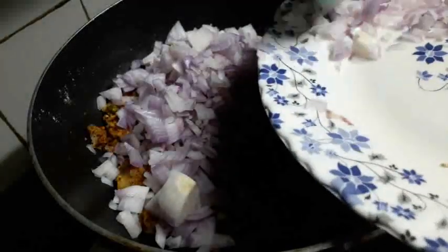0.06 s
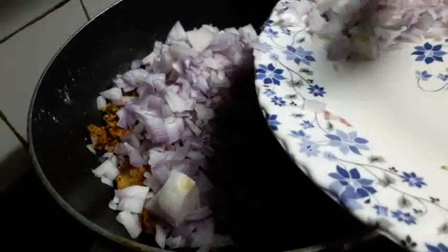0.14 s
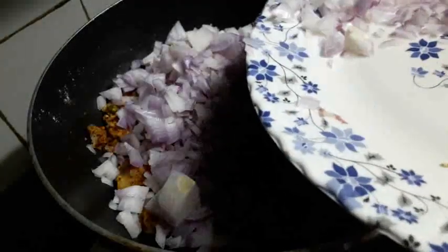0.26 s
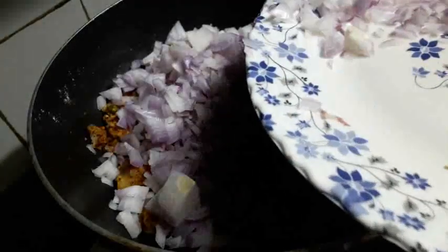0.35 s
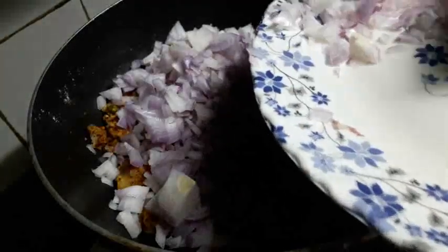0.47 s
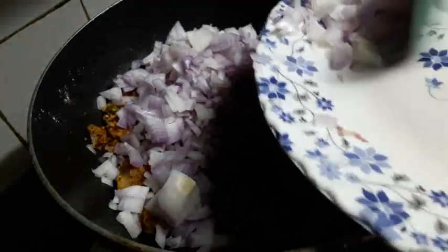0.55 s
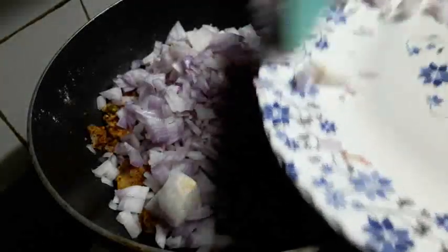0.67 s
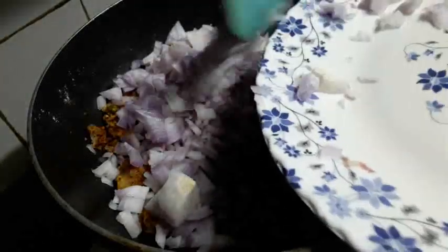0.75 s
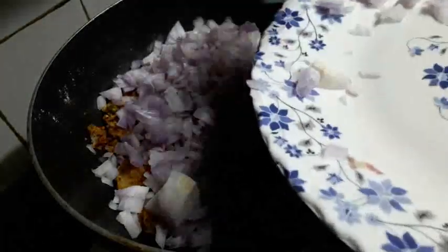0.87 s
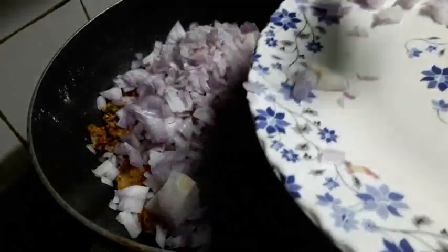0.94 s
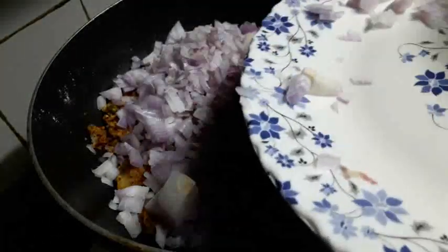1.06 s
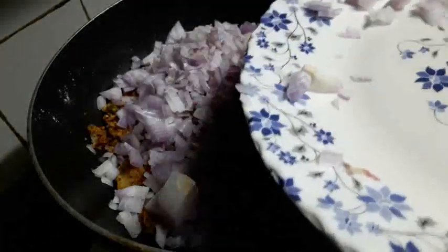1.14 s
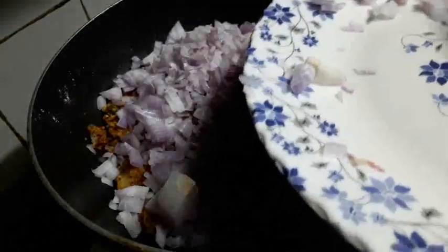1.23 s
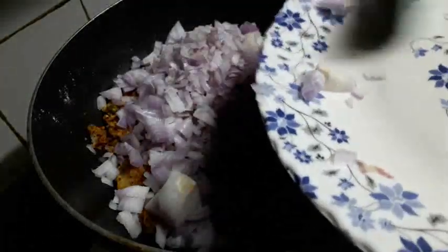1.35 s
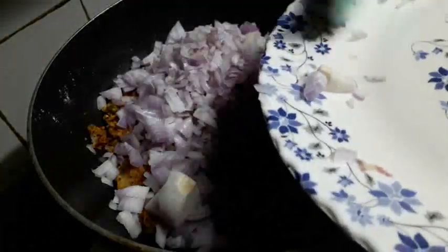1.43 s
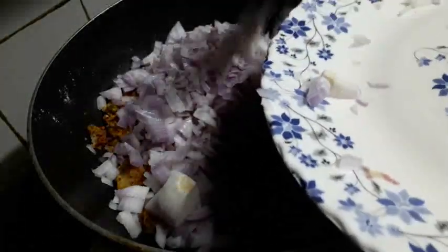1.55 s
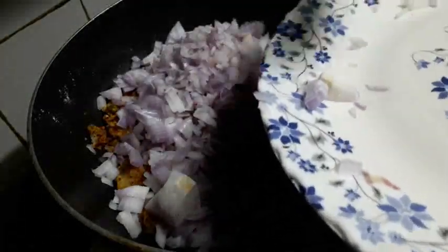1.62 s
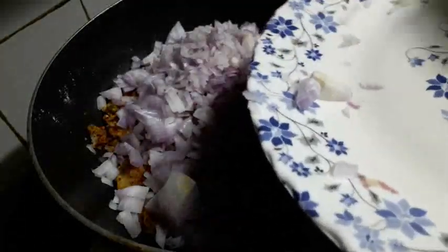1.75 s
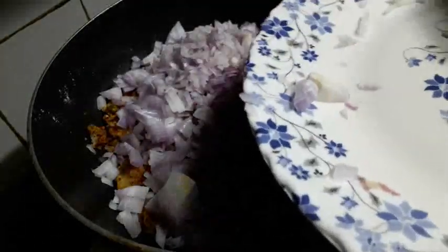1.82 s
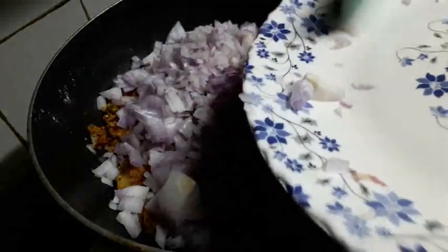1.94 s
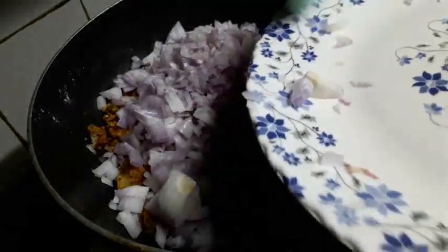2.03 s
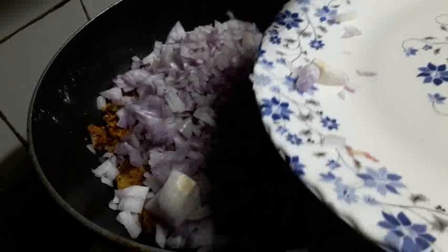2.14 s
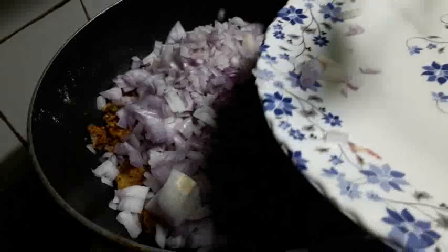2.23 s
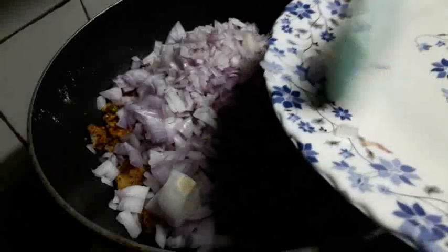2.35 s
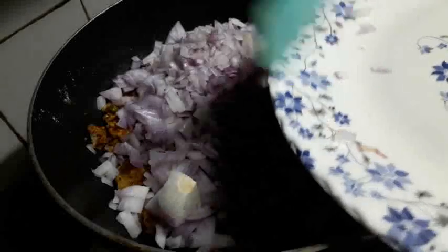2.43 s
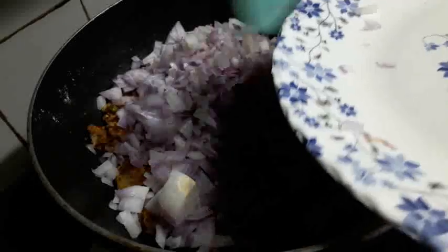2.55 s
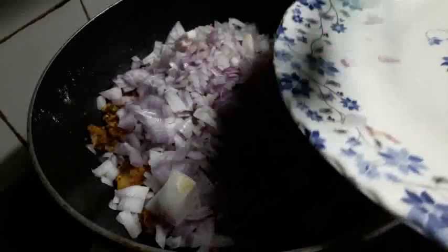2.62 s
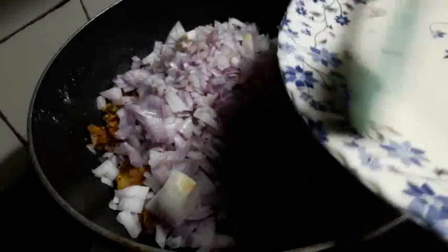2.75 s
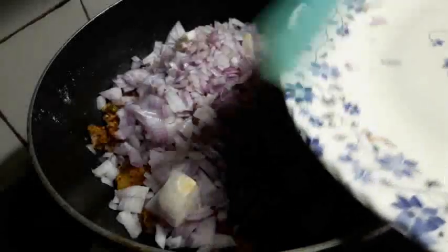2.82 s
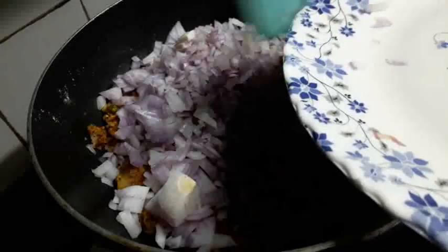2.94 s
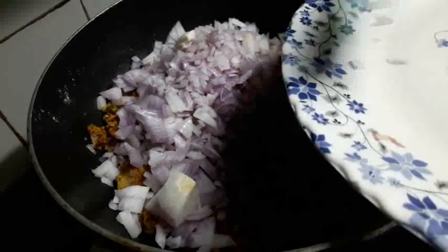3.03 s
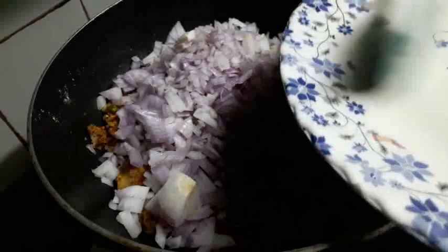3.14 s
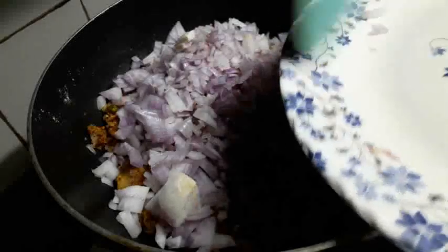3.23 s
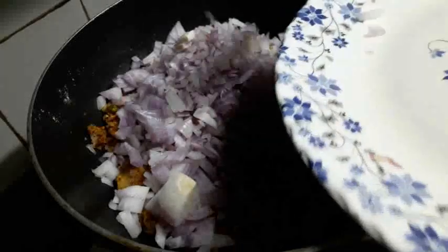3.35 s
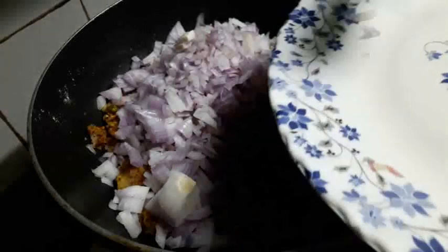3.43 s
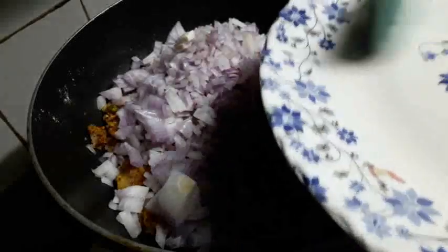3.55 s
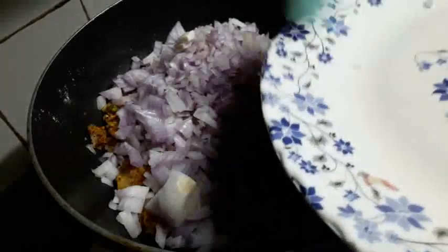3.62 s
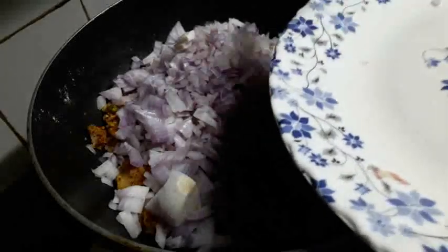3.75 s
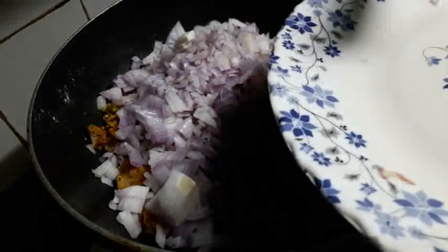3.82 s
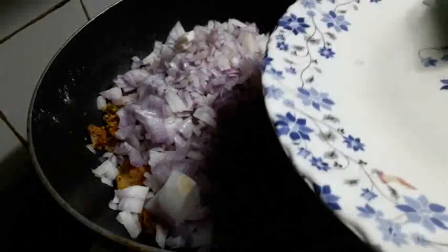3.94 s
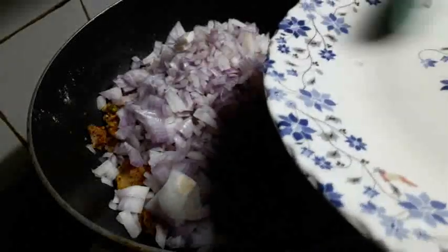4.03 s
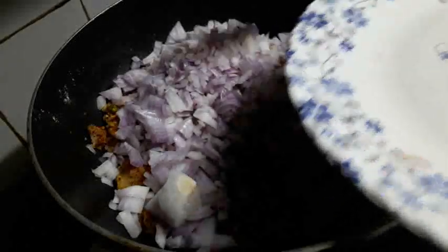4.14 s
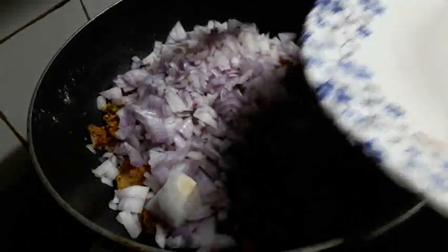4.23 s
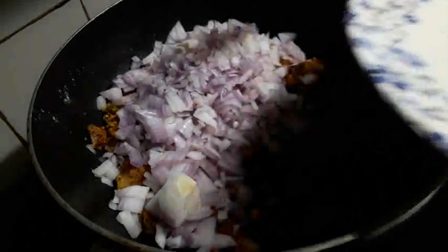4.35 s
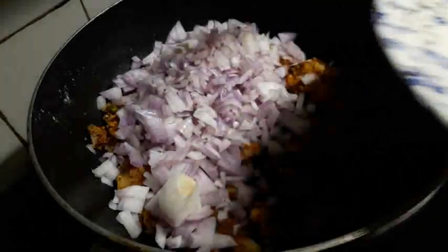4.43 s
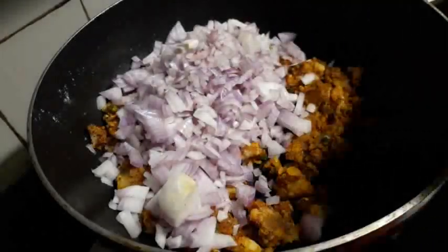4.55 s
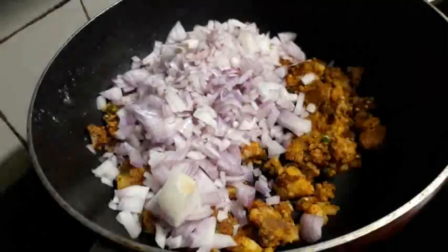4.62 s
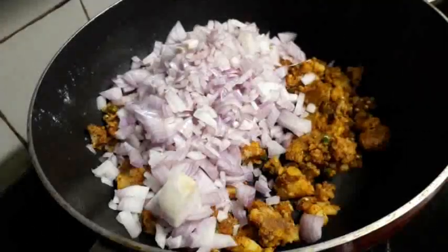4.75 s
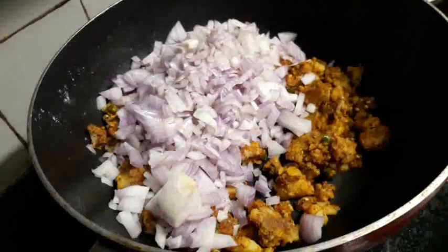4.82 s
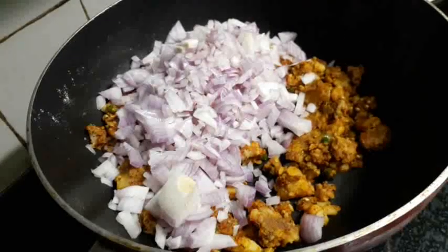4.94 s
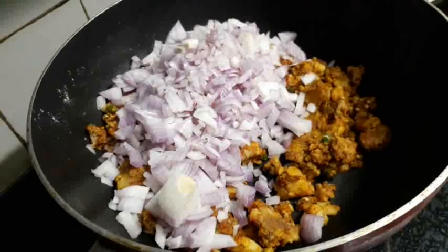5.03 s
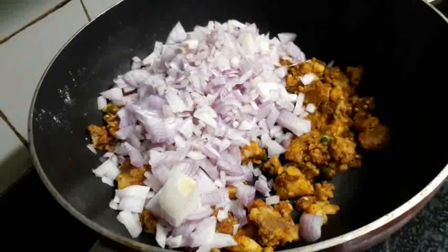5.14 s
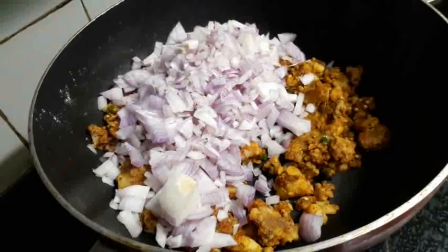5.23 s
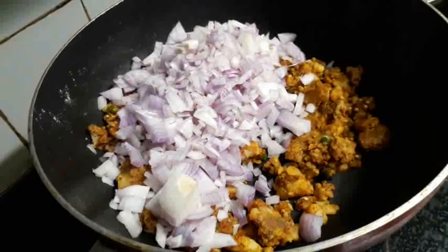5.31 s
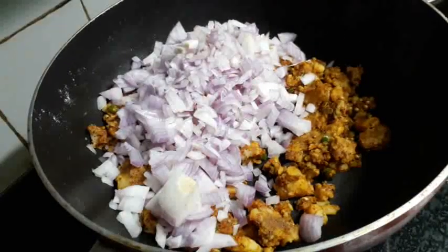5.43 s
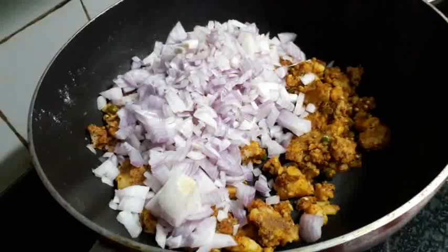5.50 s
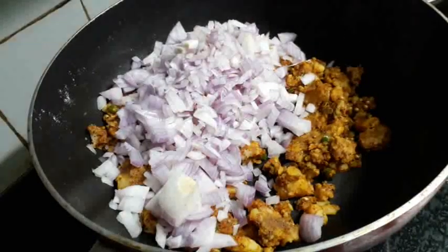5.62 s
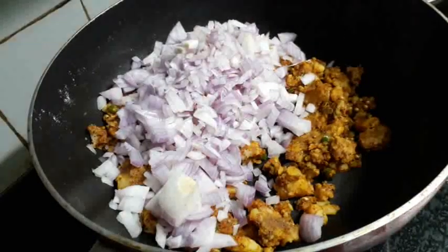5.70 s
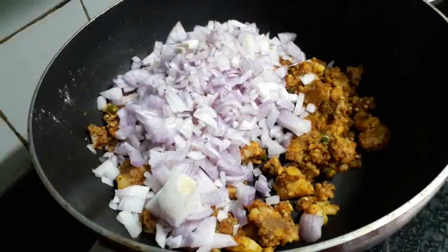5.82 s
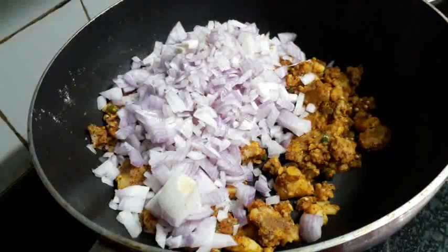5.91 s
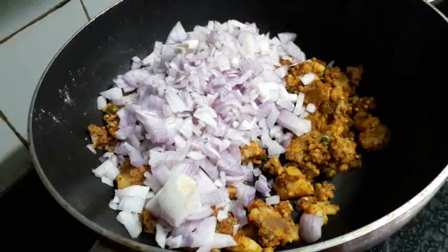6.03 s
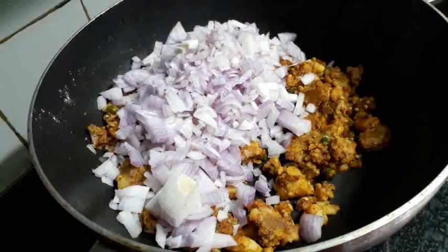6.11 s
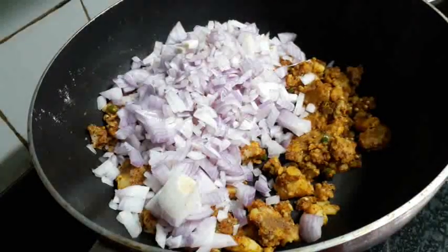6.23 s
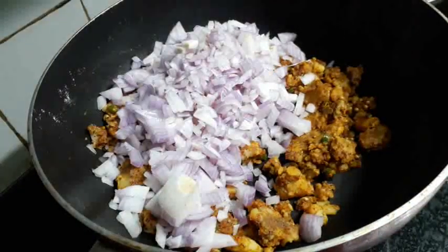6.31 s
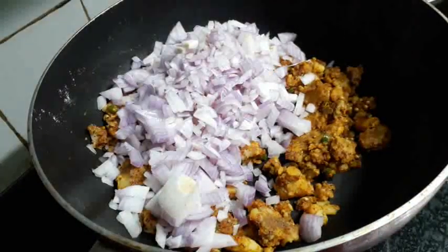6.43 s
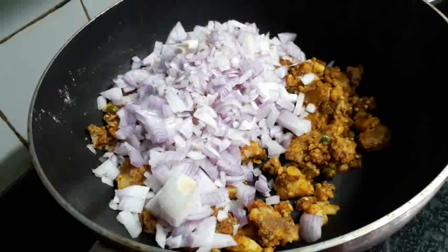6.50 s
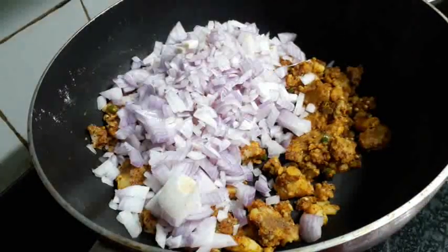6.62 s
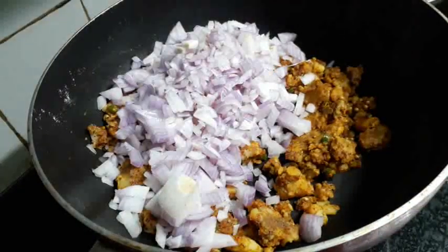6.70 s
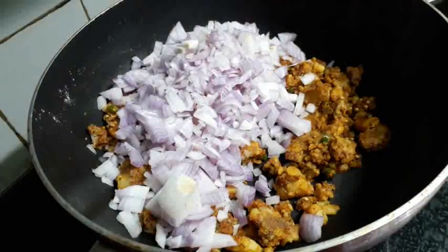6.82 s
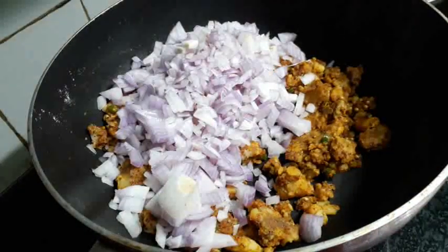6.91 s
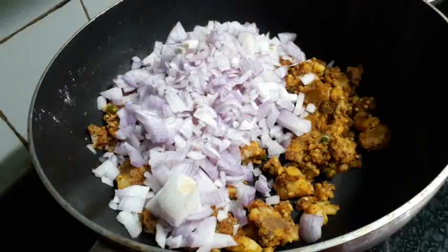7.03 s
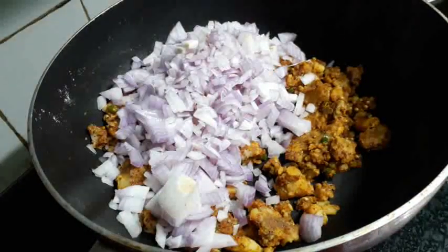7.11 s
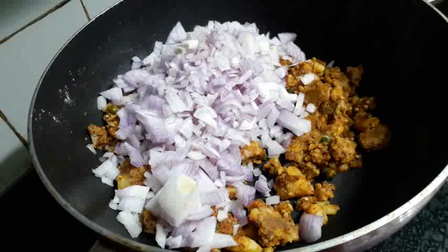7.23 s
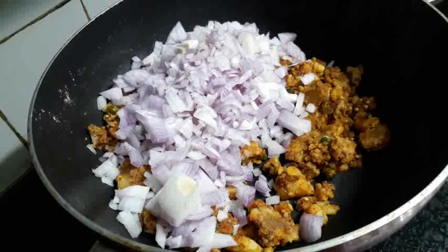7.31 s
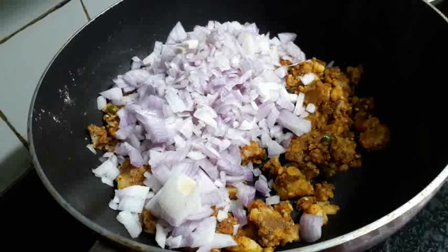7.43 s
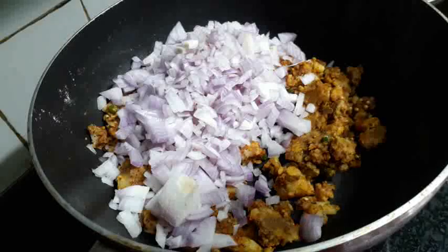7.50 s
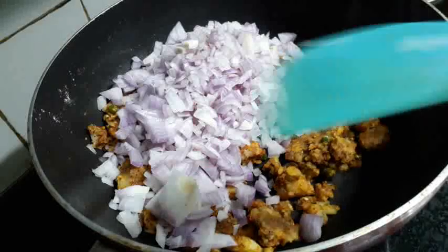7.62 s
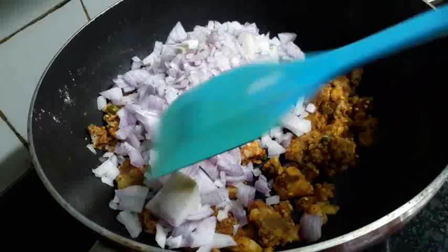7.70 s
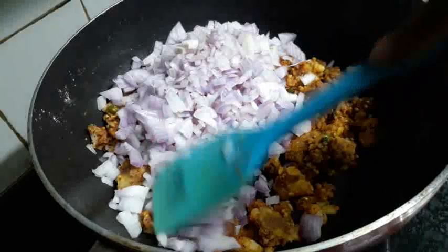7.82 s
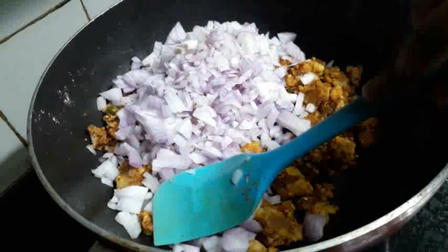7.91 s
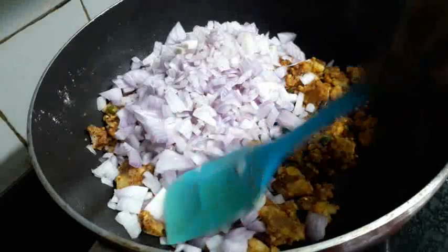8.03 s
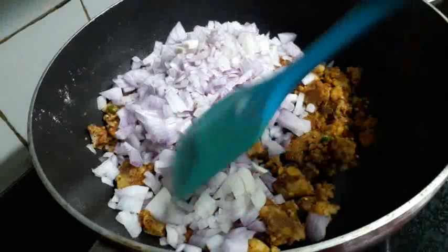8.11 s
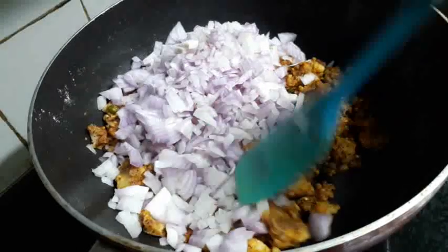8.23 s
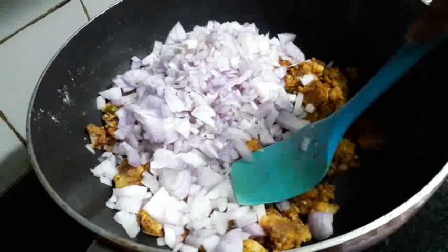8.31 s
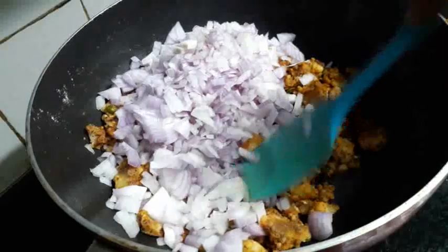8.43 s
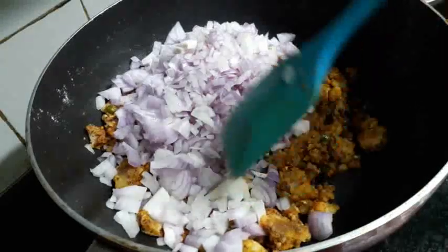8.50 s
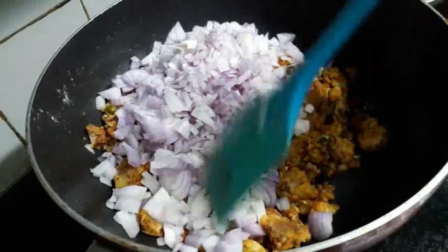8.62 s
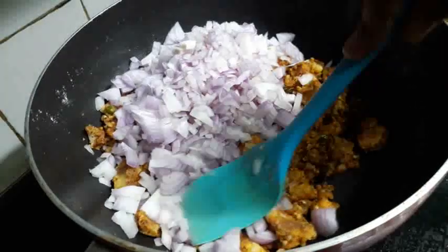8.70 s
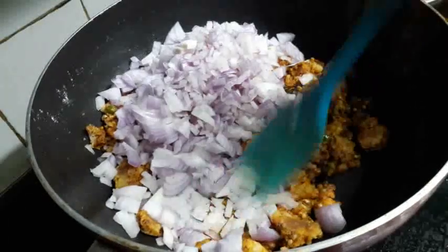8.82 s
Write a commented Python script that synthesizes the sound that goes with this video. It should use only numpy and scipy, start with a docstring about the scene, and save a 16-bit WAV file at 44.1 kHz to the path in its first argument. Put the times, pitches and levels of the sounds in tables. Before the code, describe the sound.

Oil sizzles softly over a low gas flame in a small kitchen, heard up close. A soft spatula taps and wipes chopped onion off a plate, which clacks sharply against the pan's rim several times. The sizzle grows brighter as the plate lifts away. The plate is set down and clacks on the counter, then the spatula digs quietly through crisp onion in the pan.

```python
"""Chopped onion is pushed off a plate into a hot pan in a small tiled kitchen.
Oil hisses and pops over a rumbling gas flame. A silicone spatula taps dull notes from the plate and wipes
wet onion over the glaze; pieces snap, the plate clacks on the rim, the pan thuds on its stand.
From 4.3 s the plate is lifted and the frying opens up. The plate is set down at 5.44 s and clacks
sharply on the counter at 7.2 s. From 7.8 s the spatula digs through crisp pieces to the pan's floor."""
import sys
import numpy as np
from scipy import signal
from scipy.fft import rfft, irfft, next_fast_len
from scipy.io import wavfile

SR = 44100
rng = np.random.default_rng(int(sys.argv[2]) if len(sys.argv) > 2 else 0)


def unload_wav(signal):
    """Save mono or channel-first audio to the path in sys.argv[1] as 16-bit WAV at rate SR, clipped to [-1, 1]."""
    wavfile.write(
        sys.argv[1],
        SR,
        np.round(np.clip(np.atleast_2d(signal).T, -1, 1) * 32767).astype(np.int16),
    )


N = 390637
RING_SAMPLES = 10000
AGE_S, TIME_S = np.arange(RING_SAMPLES) / SR, np.arange(N) / SR
NOTE_HZ, OVERTONE_HZ = 353.3, 601.7  # the plate's low note and its overtone

# Spectra of flame, frying hiss, oil spray and a hard contact. Each row: frequency in Hz, level in dB.
FLAME_SPECTRUM = [(25, -46), (38, -16), (48, -0.5), (64, -13), (95, -7), (113, 2.5), (128, -1.5),
                  (185, 1.5), (230, -13), (310, -7), (540, -18), (780, -14), (1100, -25.5), (3000, -36.5)]
HISS_SPECTRUM = [(300, -7), (750, -5.5), (1100, -8.5), (1700, -5), (2400, -4), (3100, 0.5), (5200, 4),
                 (7000, 2), (8300, 3.5), (9500, -3), (11000, -23), (13000, -76)]
SPRAY_SPECTRUM = [(7000, -30), (9500, -8), (12000, 0), (13200, -1), (14800, -5.5), (16000, -26)]
CRACK_SPECTRUM = [(30, -31), (80, -36), (130, 2.5), (700, 4.5), (1150, -5), (2000, 6.5), (4200, 0),
                  (5500, 3.5), (8000, 3), (10000, -5), (15000, -5)]
# Modes of the free plate (upper), the pan's stand, the plate on the counter and the loaded pan.
# Each row: frequency in Hz, level in dB, t60 in seconds.
PLATE_MODES = [(460, -36, 0.19), (563, -27, 0.15), (630, -20.5, 0.041), (741, -11.5, 0.035),
               (800, -21, 0.038), (849, -25, 0.058), (1070, -28.5, 0.091), (1110, -27.5, 0.14),
               (1390, -16, 0.061), (1497, -20, 0.031), (1586, -26, 0.032), (1871, -12, 0.05),
               (2010, -29, 0.12), (2210, -36, 0.076), (2405, -16.5, 0.058), (2830, -29, 0.069),
               (2980, -37, 0.056), (3515, -27, 0.06), (3740, -28, 0.047), (4560, -12, 0.015),
               (5280, -26, 0.058), (5940, -27.5, 0.05), (6830, -36, 0.035), (8220, -30, 0.023),
               (9300, -41, 0.03)]
STAND_MODES = [(76, -6, 0.08), (115, -13, 0.29), (174, 2, 0.039), (220, 5, 0.034), (290, 0.5, 0.1)]
COUNTER_MODES = [(297, -24, 0.063), (490, -32, 0.031), (795, -17, 0.014), (1100, -21, 0.067),
                 (1390, -8.5, 0.048), (1500, -3.5, 0.018), (1760, -12.5, 0.053), (1830, -9.5, 0.043),
                 (1970, -19, 0.055), (2420, -9, 0.029), (3070, -25, 0.031), (4080, -20, 0.04),
                 (6300, -15, 0.023)]
PAN_MODES = [(308, -4.5, 0.028), (472, -10, 0.1), (553, -13, 0.06), (724, -4, 0.022), (810, -10, 0.026),
             (931, -4, 0.042), (1060, -13, 0.03), (1234, -7, 0.036), (1480, -9, 0.025), (2960, -1, .008),
             (4570, 0, 0.0053)]
# Onion meets hot oil as it is pushed in or stirred. Each row: start in seconds, time to release in seconds,
# boost in dB.
FLARES = [(0.244, 2, 1.5), (2.0, 0.9, 2), (8.2, 0.5, 0.5)]
# Dull plate notes. Each row: start in seconds, note level in dB, pitch in Hz, t60 in seconds,
# time to choke in seconds, relative overtone level in dB.
TAPS = [(0.16, -48, 355, 0.038, .03, -13), (.318, -33.5, 358, 0.05, .04, -14),
        (1.1118, -25.5, 355, 0.14, 0.06, -27), (1.258, -45, 350, 0.088, .05, -13),
        (1.592, -43.5, 347, 0.13, .06, -5), (1.7515, -23, 355.6, 0.23, .029, -10.5),
        (1.893, -42, 354, 0.046, .035, -15), (2.2515, -24.5, 355.6, 0.17, 0.098, -9),
        (2.658, -32.5, 344, 0.1, .05, -22), (3.0548, -22, 356, 0.22, 0.085, -16),
        (3.4522, -22, 357, 0.23, 0.037, -30), (3.874, -27.5, 354, 0.17, 0.061, -15),
        (4.6, -40.5, 356, 0.13, .07, -3.5), (5.445, -25.5, 348, 0.2, 0.086, -24)]
# Wipes and slides. Each row: midpoint in seconds, length in seconds, level in dB, band centre in Hz.
STROKES = [(0.457, 0.17, -49.5, 880), (0.579, 0.062, -53, 2840), (1.237, 0.21, -51.5, 920),
           (1.911, 0.17, -53, 1100), (2.314, 0.12, -55, 1300), (4.594, 0.14, -58.5, 900),
           (7.088, 0.17, -52.5, 1840), (7.168, 0.15, -45, 2310), (7.615, 0.078, -50.5, 2300)]
# Short sharp ticks. Each row: start in seconds, peak in dB, t60 in seconds, frequency in Hz.
TICKS = [(0.586, -34, 0.03, 3600), (0.8093, -23, 0.047, 6840), (5.438, -27, 0.057, 3850),
         (6.673, -18.5, 0.034, 12200), (6.729, -28, .02, 10000), (7.149, -29, 0.21, 9700),
         (7.953, -26, 0.011, 6500), (8.105, -16.5, 0.011, 5970), (8.131, -25, 0.017, 9000),
         (8.148, -22.5, 0.053, 12500), (8.285, -21, 0.009, 8100), (8.292, -27, 0.015, 9000),
         (8.587, -20.5, 0.014, 7600)]
# Hard plate knocks. Each row: start in seconds, level in dB, contact low-pass in Hz, favoured frequency
# in Hz, its boost in dB, starved frequency in Hz, tuning ratio, share of free ring time, rattle in dB.
CLACKS = [(0.678, 1.5, 4850, 2440, 7, 1170, .993, 0.78, -31),
          (0.6865, -7, 2200, 840, 11.5, 1120, 1.0, .7, -25),
          (1.7797, -32, 3000, 1880, -3, 735, 1.0, 0.82, -14),
          (2.3896, -1, 7200, 2230, 2.5, 2840, 0.99, .85, -17),
          (2.421, -18.5, 700, 550, 18.5, 1100, 1.0, 1, -10),
          (2.8078, 1.5, 11300, 1630, 3.5, 540, 1.01, 0.83, -29),
          (3.1691, 1.5, 8450, 1790, 2, 2500, 1.017, 0.92, -14),
          (3.1814, -10, 1100, 680, -2, 1400, 0.89, .8, -17),
          (3.193, -15.5, 3000, 2400, 4, 1880, 1.01, 1, -9),
          (3.216, -22, 700, 600, 5, 1100, 0.91, 0.81, -14), (3.475, -35, 1600, 1400, 7, 735, 0.89, .6, -12),
          (3.501, -31, 900, 795, 4, 1880, 1.1, 0.96, -4),
          (4.0455, -9.5, 2900, 1400, 4.5, 2420, 1.01, 0.93, -19),
          (4.0572, -12, 2500, 1390, -1, 2390, 1, 0.82, -2), (5.4409, -14, 890, 1080, 1, 1850, 0.9, .9, -14)]
# Low thuds. Each row: start in seconds, level in dB.
THUDS = [(2.251, -36), (2.286, -40), (2.301, -38), (2.3887, -37), (2.658, -31), (5.446, -31.5)]
# Plate on counter. Each row: start in seconds, level in dB, contact low-pass in Hz.
COUNTER_KNOCKS = [(4.67, -36, 1500), (5.835, -37.5, 3500), (5.9, -32.5, 1800), (7.140, -43, 5000),
                  (7.2178, -2, 4150)]
# Spatula in the pan. Each row: start in seconds, relative level in dB, decay scale in seconds,
# knock over rub in dB, frequency of the pan's response in Hz, crunch over rub in dB.
DIGS = [(7.829, -31.5, 0.074, -3, 1100, -6), (8.074, -30, 0.09, -4.5, 1200, -3.5),
        (8.214, -43, 0.025, -18, 1000, -5), (8.274, -36.5, 0.083, -6, 950, -5),
        (8.66, -26.5, 0.06, -10, 750, -14), (8.681, -33, 0.046, -12, 1100, 0),
        (8.765, -27.5, 0.053, -13, 900, -3.5), (8.783, -31.5, 0.052, -13, 700, -8),
        (8.794, -32, 0.03, -18, 900, 3)]


def undb(db):
    """Decibels to gain."""
    return 10 ** (np.asarray(db) / 20)


def unit(x):
    """Scale to rms 1."""
    return x / np.sqrt(np.mean(x ** 2))


def fade(t60_s):
    """Exponential decay."""
    return np.exp(-np.log(1000) * AGE_S / max(t60_s, 1 / SR))


def add(track, start_s, sound):
    """Mix a sound into the track."""
    i = max(int(start_s * SR), 0)
    track[i:i + len(sound)] += sound[:max(N - i, 0)]


def cut(x, hz, kind, order=2):
    """Butterworth filter."""
    sos = signal.butter(order, np.clip(hz, 10, SR / 2.2), kind, fs=SR, output="sos")
    return signal.sosfilt(sos, x)


def noise(spectrum, size):
    """Shaped noise, rms 1."""
    hz, db = np.transpose(spectrum)
    padded = next_fast_len(size, real=True)
    bins_hz = np.fft.rfftfreq(padded, 1 / SR) + 1
    gain = undb(np.interp(np.log(bins_hz), np.log(hz), db))
    return unit(irfft(rfft(rng.standard_normal(padded)) * gain, padded)[:size])


def walk(rate_hz):
    """Random drift, spread near 1."""
    knots = rng.standard_normal(int(N / SR * rate_hz) + 2)
    return np.interp(TIME_S * rate_hz, np.arange(len(knots)), knots)


def clicks(per_s, size=RING_SAMPLES):
    """Impulses of random time and size."""
    return (rng.random(size) < per_s / SR) * rng.standard_normal(size)


def ring(modes):
    """Damped modes after one sharp blow."""
    return sum(undb(db) * fade(t60_s) * np.cos(2 * np.pi * hz * AGE_S) for hz, db, t60_s in modes)


def gas_flame():
    """Unsteady flame rumble and a faint wavering hum."""
    rumble = noise(FLAME_SPECTRUM, N) * undb(1.05 * walk(7.5))
    hum_hz = 113 + 5 * walk(25)
    hum = np.sin(2 * np.pi * np.cumsum(hum_hz) / SR) * undb(3 * walk(12))
    return undb(-52) * rumble + undb(-56.5) * hum


def frying(lift_s=4.34, lift_length_s=0.3):
    """Bubbles merge into a hiss under fine oil spray; the plate shades both until lifted."""
    covered = np.clip(1 - (TIME_S - lift_s) / lift_length_s, 0, 1)
    shade_db = -5.5 * covered
    hiss_db = -45 + shade_db + flare_db()
    spray_db = -52.5 - 11.5 * covered
    hiss = noise(HISS_SPECTRUM, N) * undb(0.6 * walk(45))
    bubbles = undb(-16) * unit(cut(clicks(per_s=120, size=N), [2500, 8000], "band", order=4))
    spray = noise(SPRAY_SPECTRUM, N) * undb(0.63 * walk(27))
    return undb(hiss_db) * (hiss + bubbles) + undb(spray_db) * spray + undb(shade_db) * pops()


def pops(per_s=14, low_hz=3190, high_hz=8450, t60_s=0.042):
    """Single bubbles burst, each with a tiny ping."""
    out = np.zeros(N)
    for when, pitch, size in rng.random((int(per_s * N / SR), 3)):
        hz = low_hz * (high_hz / low_hz) ** pitch
        db = -45 + 4.5 * (2 * size - 1)
        add(out, when * N / SR, ring([(hz, db, t60_s)]))
    return out


def low_note(hz, t60_s, hold_s, overtone_db, choked_db=-19):
    """The plate's low note and its overtone ring freely, then are choked."""
    overtone = np.cos(2 * np.pi * OVERTONE_HZ * hz / NOTE_HZ * AGE_S) * fade(1.45 * t60_s)
    note = np.cos(2 * np.pi * hz * AGE_S) * fade(t60_s) + undb(overtone_db) * overtone
    free = np.exp(-(AGE_S / hold_s) ** 6)
    return note * (free + undb(choked_db) * (1 - free))


def near(hz, spot_hz, width_octaves=0.21):
    """Bell weight, 1 at spot_hz."""
    return np.exp(-(np.log2(hz / spot_hz) / width_octaves) ** 2)


def crack(t60_s, tail_db, tail_t60_s):
    """Crowded high modes: a burst and a weaker tail."""
    return noise(CRACK_SPECTRUM, RING_SAMPLES) * (fade(t60_s) + undb(tail_db) * fade(tail_t60_s))


def upper_modes(tuning, starved_hz, ring_share=1, favoured_hz=None, favour_db=0):
    """The plate's upper modes and crack; modes with a node near the blow are starved."""
    hz, db, t60_s = np.transpose(PLATE_MODES)
    if favoured_hz:
        db = db + favour_db * near(hz, favoured_hz)
    louder, sharper = rng.standard_normal((2, len(hz)))  # grip and load vary per blow
    db = db - 11 * near(hz, starved_hz) + 1.4 * louder
    modes = ring(zip(hz * tuning * (1 + 0.0054 * sharper), db, t60_s * ring_share))
    return modes + undb(-12) * crack(t60_s=0.016, tail_db=-12, tail_t60_s=0.078)


def taps(firm_tap_db=-8.5):
    """Dull plate notes with faint upper modes: the soft blade lands; at 5.44 s the plate is set down."""
    out = np.zeros(N)
    for start_s, db, hz, t60_s, hold_s, overtone_db in TAPS:
        firmness_db = db - firm_tap_db
        upper = undb(-22 + 0.37 * firmness_db) * upper_modes(hz / NOTE_HZ, starved_hz=4000)
        contact_hz = 1190 * 2 ** (-firmness_db / 27)  # firmer is duller
        note = undb(db) * cut(low_note(hz, t60_s, hold_s, overtone_db), 800, "low")
        add(out, start_s, cut(upper, contact_hz, "low") + note)
    return out


def slaps(thump_hz=121.5):
    """With each dull note, a pitchless contact smack and a low thump."""
    out = np.zeros(N)
    thump = np.sin(2 * np.pi * thump_hz * AGE_S) * fade(0.046)
    for start_s, db, *_ in TAPS:
        smack = cut(rng.standard_normal(RING_SAMPLES) * fade(0.069), [396, 705], "band")
        add(out, start_s, undb(db - 7.5) * smack / np.abs(smack).max() + undb(db - 5.5) * thump)
    return out


def flare_db(attack_s=0.22, release_s=0.52):
    """Onion pushed in or stirred lifts the hiss: swell, hold, settle."""
    boost_db = np.zeros(N)
    for start_s, length_s, db in FLARES:
        rise = (TIME_S - start_s) / attack_s
        fall = 1 - (TIME_S - start_s - length_s) / release_s
        boost_db += db * np.clip(np.minimum(rise, fall), 0, 1)
    return boost_db


def slips(per_s, spread_db):
    """Stick-slip: dense clicks of uneven size."""
    return unit(clicks(per_s) * undb(spread_db * rng.standard_normal(RING_SAMPLES)))


def strokes():
    """Wet pieces drag over the glaze; jerky friction faintly rings the plate."""
    out = np.zeros(N)
    plate = ring(PLATE_MODES)
    for middle_s, length_s, db, hz in STROKES:
        friction = slips(per_s=1400, spread_db=3) * undb(3.2 * walk(70)[:RING_SAMPLES])
        ringing = signal.fftconvolve(friction, plate)[:RING_SAMPLES]
        rub = cut(unit(friction) + undb(-9) * unit(ringing), [hz / 1.68, hz * 1.77], "band")
        swell = np.sin(np.pi * np.minimum(AGE_S / length_s, 1))
        add(out, middle_s - length_s / 2, undb(db) * swell * unit(rub))
    return out


def ticks():
    """Short sharp ticks: onion snaps, oil spits, and the plate's edge as it is set down."""
    out = np.zeros(N)
    for start_s, db, t60_s, hz in TICKS:
        burst = rng.standard_normal(RING_SAMPLES) * fade(t60_s)
        fizz = cut(burst, [hz / 2, hz * 1.08], "band", order=1)
        add(out, start_s, undb(db) * fizz / np.abs(fizz).max())
    return out


def chatter(delay_s=0.0038):
    """The plate's edge skitters: fading rebounds, unit energy."""
    touches = clicks(per_s=310) * fade(0.1) * (AGE_S > delay_s)
    return touches / (np.linalg.norm(touches) + 1e-9)


def clacks(reflection_s=0.002724):
    """Hard knocks wake every plate mode: on the pan's rim, then at 5.44 s as it is set down."""
    out = np.zeros(N)
    for start_s, db, contact_hz, spot_hz, favour_db, starved_hz, tuning, ring_share, rattle_db in CLACKS:
        upper = upper_modes(tuning, starved_hz, ring_share, spot_hz, favour_db)
        rebounds = signal.fftconvolve(upper, chatter())[:RING_SAMPLES]
        rattle = undb(rattle_db) * cut(rebounds, 3900, "low")
        note = undb(-22) * low_note(NOTE_HZ * tuning, t60_s=0.12, hold_s=0.045, overtone_db=-7)
        damping = np.exp(-(AGE_S / (0.045 * ring_share)) ** 2)  # the plate comes to rest
        clack = undb(db) * cut((upper + rattle) * damping + note, contact_hz, "low")
        add(out, start_s, clack)
        add(out, start_s + reflection_s, undb(-17) * cut(clack, 6000, "low"))
    return out


def thuds():
    """Low rattling thuds: the pan on its stand, then at 5.44 s the plate set down."""
    out = np.zeros(N)
    thud = cut(ring(STAND_MODES), 240, "low")
    for start_s, db in THUDS:
        rattle = unit(cut(rng.standard_normal(RING_SAMPLES), [85, 260], "band")) * fade(0.083)
        add(out, start_s, undb(db - 1) * (thud + rattle))
    return out


def counter_knocks():
    """The plate meets the counter, which damps it to a short, bright clack."""
    out = np.zeros(N)
    for start_s, db, contact_hz in COUNTER_KNOCKS:
        knock = ring(COUNTER_MODES) + undb(-15) * crack(t60_s=0.024, tail_db=-9, tail_t60_s=0.063)
        add(out, start_s, undb(db) * cut(knock, contact_hz, "low"))
    return out


def digs():
    """The spatula knocks on the pan's floor and stutters over it, crushing onion."""
    out = np.zeros(N)
    for start_s, db, decay_s, knock_db, hz, crunch_db in DIGS:
        knock = cut(ring(PAN_MODES), [hz / 3.9, hz * 2.6], "band", order=1)
        stutter = slips(per_s=3000, spread_db=0) * fade(2 * decay_s)
        rub = signal.fftconvolve(stutter, knock)[:RING_SAMPLES]
        crunch = cut(slips(per_s=3600, spread_db=4), [1500, 6500], "band", order=1) * fade(2.9 * decay_s)
        dig = undb(knock_db) * unit(knock) + unit(rub) + undb(crunch_db) * unit(crunch)
        add(out, start_s, undb(db - 17.5) * unit(dig))
    return out


def room(x, wet_db=-17, low_t60_s=0.21, high_t60_s=0.17, gap_s=0.0034):
    """Close tiled walls: a short, dense echo whose treble dies first."""
    white = rng.standard_normal(RING_SAMPLES)
    lows = cut(white, 810, "low") * fade(low_t60_s)
    highs = undb(-3.5) * cut(white, 2000, "high") * fade(high_t60_s)
    tail = (lows + highs) * np.clip(AGE_S / gap_s - 1, 0, 1)
    return x + undb(wet_db) * signal.fftconvolve(x, tail / np.linalg.norm(tail))[:N]


def scene():
    """Both channels are alike, except the top treble, which arrives scattered."""
    handling = taps() + clacks() + slaps() + counter_knocks() + digs() + thuds() + strokes() + ticks()
    handling = cut(handling, 99, "high", order=3)  # small things radiate no deep bass
    mid = room(handling) + frying() + gas_flame()
    scatter = rng.standard_normal(RING_SAMPLES) * fade(0.02)
    scattered = signal.oaconvolve(handling, scatter / np.linalg.norm(scatter))[:N]
    side = cut(undb(-8) * scattered + undb(-5) * frying(), 10600, "high", order=10)
    return np.array([mid + side, mid - side])


def record(dry, ceiling=0.88, bottom_hz=46, top_hz=15600):
    """Round the peaks, cut the deepest bass and the top."""
    rounded = cut(ceiling * np.tanh(dry / ceiling), bottom_hz, "high", order=4)
    return signal.sosfilt(signal.ellip(8, 0.2, 70, top_hz, fs=SR, output="sos"), rounded)


dry = scene()
out = record(dry)
unload_wav(out)
```